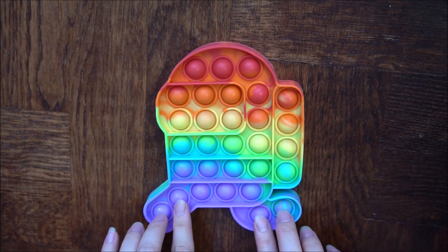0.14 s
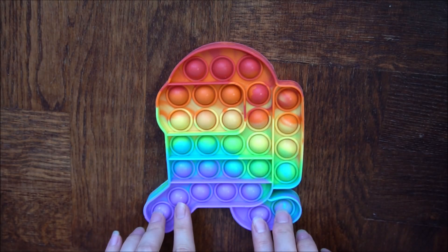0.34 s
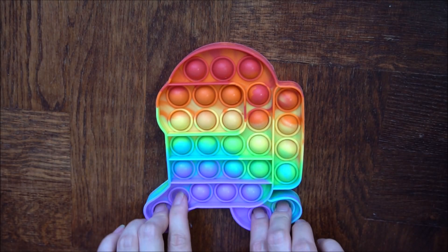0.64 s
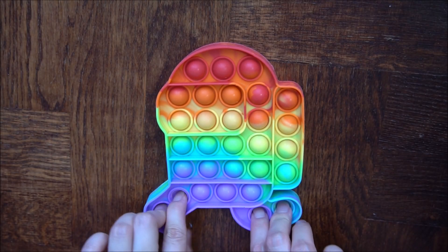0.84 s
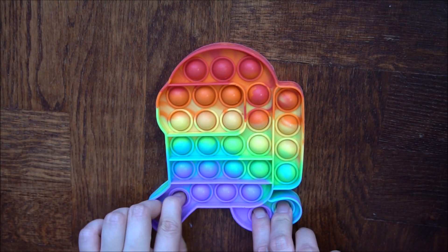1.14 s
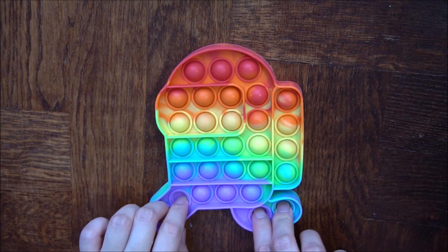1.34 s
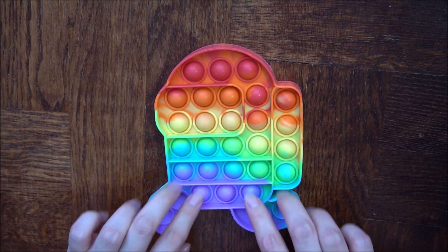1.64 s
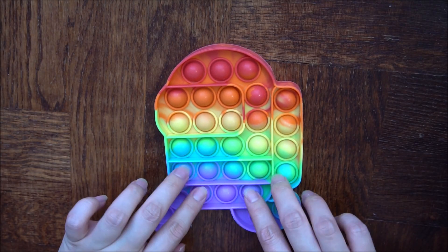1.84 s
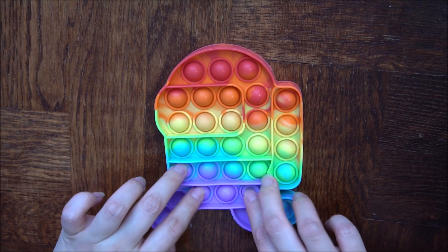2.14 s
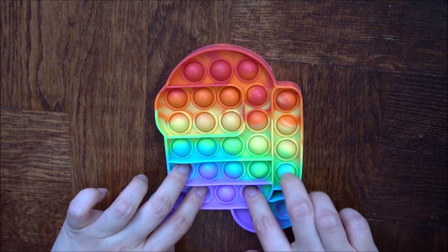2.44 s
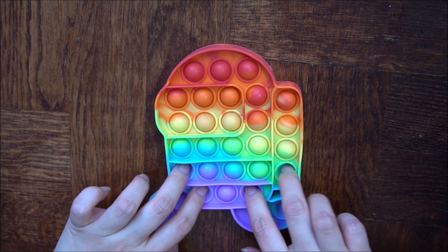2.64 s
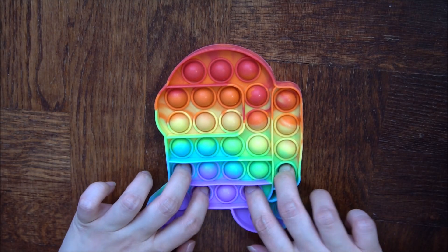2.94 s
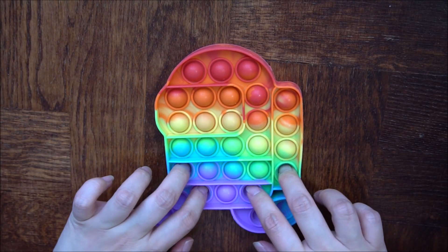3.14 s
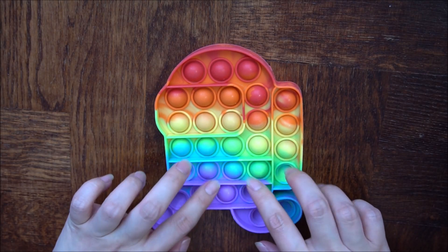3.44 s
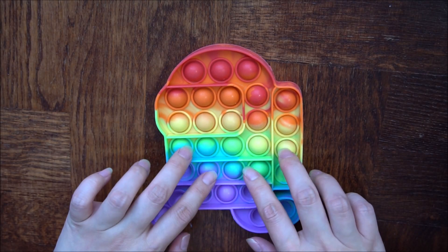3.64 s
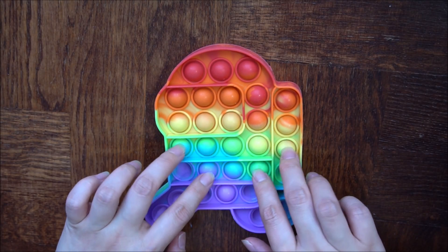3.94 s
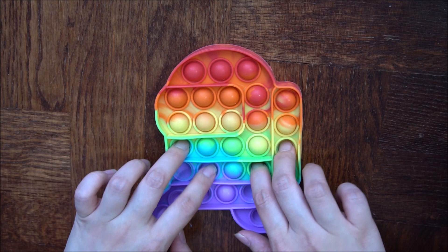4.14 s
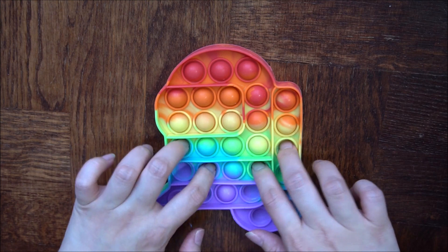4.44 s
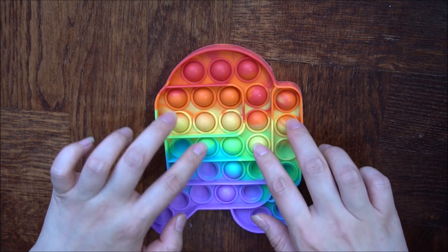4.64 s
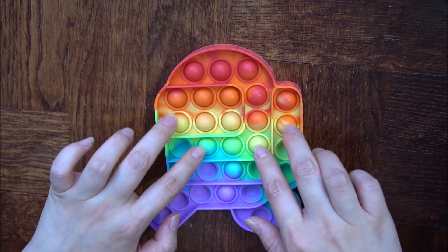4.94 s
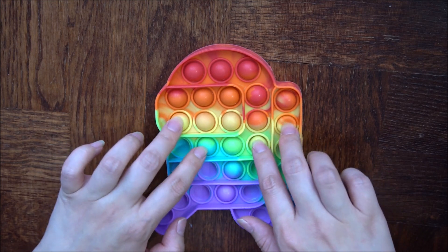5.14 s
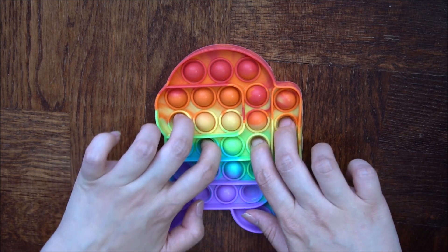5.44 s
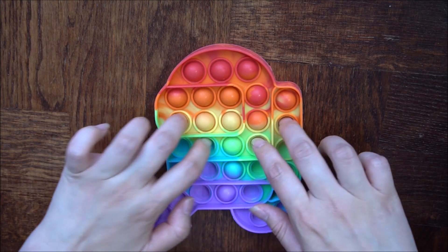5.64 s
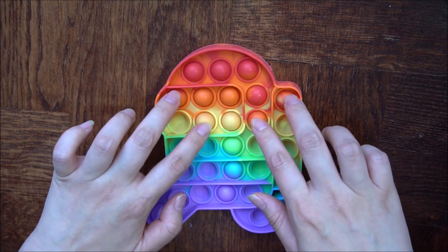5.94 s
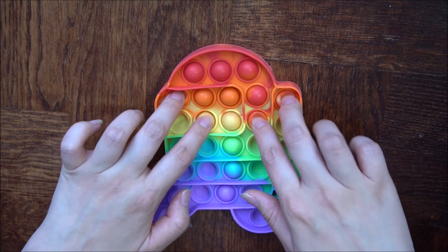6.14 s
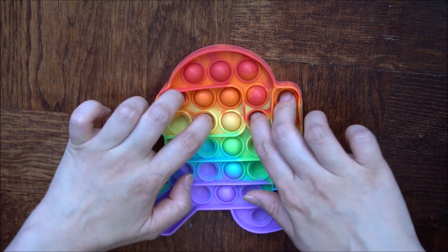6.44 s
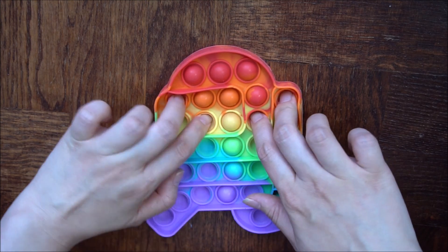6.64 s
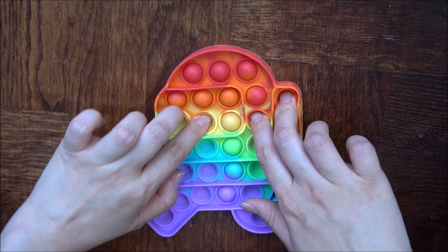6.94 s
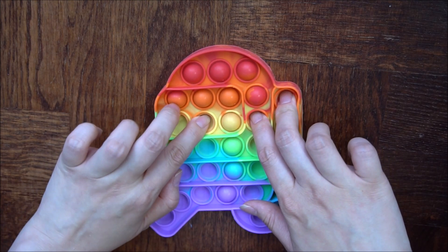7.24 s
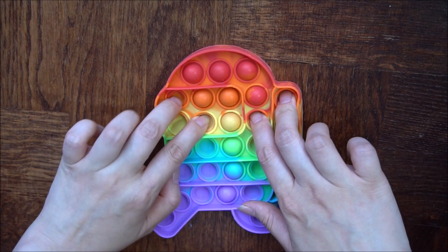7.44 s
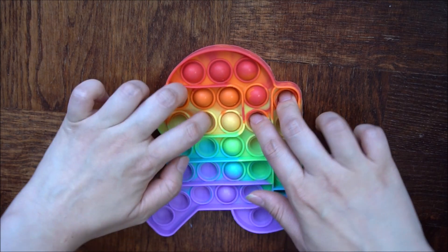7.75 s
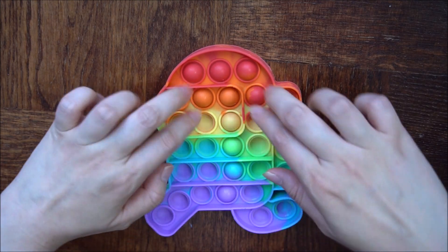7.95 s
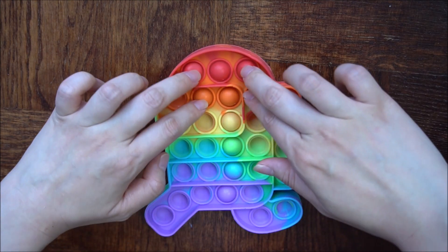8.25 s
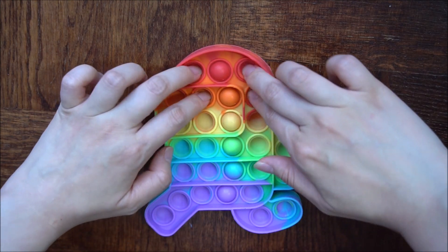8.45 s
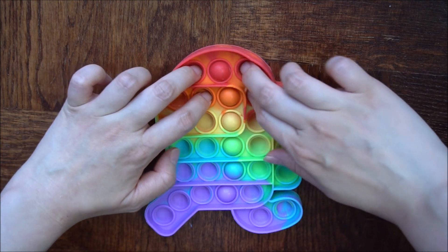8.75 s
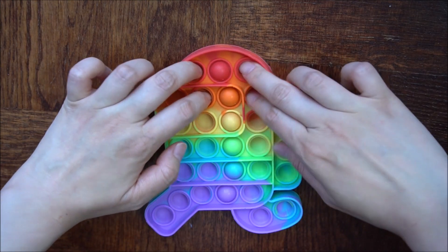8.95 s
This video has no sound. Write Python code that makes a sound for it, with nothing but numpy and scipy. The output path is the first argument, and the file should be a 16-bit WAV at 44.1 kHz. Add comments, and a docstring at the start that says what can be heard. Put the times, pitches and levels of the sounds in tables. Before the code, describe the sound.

In a small, quiet room, a silicone bubble toy is popped on a wooden tabletop, close to the microphone. The hollow pops fall singly or in pairs about every second or two, the loudest near the middle, with a sharp snapping one a little later, then softer ones. Gentle fingertip knocks and faint squeaks of skin on rubber fill the gaps, over steady low rumble, hiss and a very faint thin whine.

```python
"""In a small, quiet room, fingertips press the bubbles of a silicone pop-it toy on a wooden table.
Each dome flips with a short hollow ring, slaps the wood and sometimes snaps sharply; between pops, fingers
knock softly, rub and squeak on the rubber. Underneath lie room rumble and a close stereo microphone's
hiss and thin whine. A low hum comes up near the end."""
import sys
import numpy as np
from scipy import signal
from scipy.io import wavfile
from scipy.ndimage import uniform_filter1d

SR = 44100
rng = np.random.default_rng(int(sys.argv[2]) if len(sys.argv) > 2 else 0)


def wrap_up_sound(samples):
    """Save the sound to the file named by the first command line argument, as 16-bit audio."""
    columns = np.atleast_2d(samples).T
    # keep every value between -1 and 1, then stretch to whole-number steps
    tamed = np.clip(columns, -1, 1)
    steps = np.round(tamed * 32767).astype(np.int16)
    wavfile.write(sys.argv[1], SR, steps)


N = 401751
TIME = np.arange(N) / SR
BRIEF = TIME[:SR // 10]

# tone colour of the rumble and hiss: (frequency [Hz], relative spectral density [dB])
BED_SPECTRUM = [(22, -26), (31, -4.5), (42, -5.5), (90, 0.5), (134, -1.5), (204, -1), (270, -8),
                (388, -6.5), (472, -9.5), (624, -11.5), (825, -12), (1330, -16), (5380, -23),
                (12100, -25.5), (13200, -22), (16000, -27)]
# how alike left and right are in that bed: (frequency [Hz], correlation [0-1])
BED_LIKENESS = [(30, 0.51), (100, 1), (250, 0.27), (700, 0.05), (2000, 0.04), (15000, 0.19)]
# electronic whine: (pitch [Hz], width [Hz], level [dB])
WHINE_LINES = [(5486, 120, -78), (10950, 250, -82), (13151, 25, -76)]
# soft fingertip knocks, levels as for the flips: (time [s], dome pitch [Hz], dome [dB], tick [dB])
FINGER_KNOCKS = [(0.5534, 656, -34.5, -34.5), (.948, 390, -47, -50), (1.7142, 760, -44, -43),
                 (1.7279, 570, -35.5, -56), (2.273, 480, -38, -53), (2.417, 550, -32.5, -53),
                 (4.51, 530, -35.5, -48.5), (5.7203, 520, -36, -42.5), (6.7435, 444, -40.5, -61),
                 (6.9351, 510, -31.5, -66), (7.2228, 500, -32, -52), (7.3924, 430, -37.5, -42),
                 (8.1207, 515, -39, -49), (8.397, 553, -41.5, -61), (8.615, 480, -33, -52),
                 (8.624, 587, -36.5, -60), (9.0033, 517, -33.5, -49)]
# dome flips, each level being the part's energy packed into one millisecond: (time [s], dome pitch [Hz],
# dome [dB], table thud [dB], slap [dB], slap pitch [Hz], snap [dB], snap pitch [Hz])
DOME_FLIPS = [(.5732, 816, -12.5, -39, -20, 1470, -31, 6960),
              (.6733, 560, -24.5, -25.5, -18.5, 1496, -24.5, 10140),
              (2.2799, 505, -24.5, -29, -34.5, 1220, -50, 4500),
              (2.2972, 570, -31, -32.5, -25, 1170, -42.5, 3280),
              (2.6434, 380, -32, -32, -30, 870, -51, 6100), (4.1278, 554, -9, -43, -20, 1060, -31, 2360),
              (4.138, 495, -21.5, -27, -26, 1120, -27.5, 6400),
              (4.2029, 690, -17.5, -32, -21, 1326, -35, 3400),
              (5.2403, 834, -14.5, -32.5, -24.5, 1106, -33, 2800),
              (5.3355, 493, -19, -33, -21.5, 1320, -26, 2880),
              (6.258, 664, -19.5, -30, -13.5, 1236, -11.5, 8130),
              (6.2609, 560, -23.5, -38.5, -27, 1200, -22.5, 7600),
              (6.877, 810, -28, -30.5, -41, 1040, -54, 3600),
              (7.523, 800, -25.5, -28.5, -27.5, 1224, -32.5, 3920),
              (8.476, 432, -28, -29.5, -28, 1090, -41, 4000)]
# thud of the wooden table: (frequency [Hz], relative level [dB], t60 [s])
WOOD_MODES = [(192, -2.5, 0.034), (243, 1.5, 0.023), (306, -1.5, 0.025), (420, 0, 0.015), (481, 0.5, 0.022)]
# rubber slapping the table top: (frequency [x slap pitch], relative level [dB], t60 [s])
RUBBER_MODES = [(1.0, 12.5, 0.01), (1.2, 4.5, 0.029), (1.36, 6, 0.012), (1.55, 6.5, 0.012),
                (1.85, 8.5, 0.0028), (2.3, -12, 0.011)]
# sharp snap of a dome's rim: (frequency [x snap pitch], relative level [dB], t60 [s])
RIM_MODES = [(.47, 11.5, 0.0018), (.67, 14, 0.0018), (.89, 6, 0.011), (1.0, 9, 0.0052),
             (1.13, 15.5, 0.0017)]
# early reflections off the table and nearby things: (delay [s], gain [x pressure])
REFLECTIONS = [(.00325, 0.25), (.00495, 0.13), (.0059, 0.24), (.00638, -0.11), (.0081, .18), (.0089, -0.15),
               (.0108, -0.22)]
# lingering ring of table and room: (frequency [Hz], level [dB], t60 [s])
ROOM_RINGS = [(389, -79, 0.23), (492, -52.5, 0.17), (592, -49, 0.11), (688, -66, 0.57), (862, -56, 0.24),
              (950, -62, 0.22)]
# diffuse room tail: (frequency [Hz], level [dB], t60 [s])
ROOM_TAIL = [(149, 2, 0.16), (387, -4, 0.36), (734, -2.5, 0.3), (1500, -4.5, 0.31), (2930, -2, 0.3),
             (7700, -5.5, 0.31), (11100, -6, 0.19), (16000, -8, 0.082)]
# skin sliding and peeling on silicone: (time [s], length [s], centre [Hz], level [dB])
SKIN_RUBS = [(.931, 0.024, 6000, -58), (1.497, .017, 3870, -57), (1.54, 0.064, 4460, -62),
             (2.259, 0.045, 5700, -55.5), (3.122, 0.032, 10000, -55.5), (3.132, 0.043, 3480, -57),
             (4.107, 0.007, 7960, -55), (4.5, 0.054, 2840, -56), (5.697, 0.046, 4230, -55),
             (7.508, 0.015, 12000, -40), (7.944, 0.092, 3230, -59), (8.813, 0.068, 3830, -59.5),
             (8.985, 0.022, 7960, -55.5)]
# stick-slip squeaks: (time [s], pitch [Hz], peak level [dB])
SKIN_SQUEAKS = [(3.34, 2500, -52), (3.53, 3520, -54), (5.07, 3820, -52), (5.562, 3780, -51.5),
                (6.742, 2340, -47.5), (6.80, 3580, -52), (6.866, 3460, -46.5), (7.166, 3620, -54),
                (8.007, 2180, -47.5), (8.01, 3770, -48.5)]


def from_db(db):
    """Decibels to gain."""
    return 10 ** (np.asarray(db) / 20)


def rms_one(x):
    """Scale to unit rms."""
    return x / np.sqrt(np.mean(x ** 2) + 1e-20)


def one_ms(x):
    """Scale to the energy of one millisecond at unit rms."""
    return x / np.sqrt(np.sum(x ** 2) * 1000 / SR + 1e-20)


def at_hz(table, hz, column=1):
    """Read a column of a table on a log-frequency axis."""
    table = np.array(table)
    return np.interp(np.log(hz), np.log(table[:, 0]), table[:, column])


def add(track, time_s, sound):
    """Drop a sound onto a track at its cue."""
    at = int(round(time_s * SR))
    track[at:at + len(sound)] += sound[:N - at]


def band(x, hz, octaves):
    """Band-pass around a centre."""
    edges = np.clip([hz / 2 ** (octaves / 2), hz * 2 ** (octaves / 2)], 10, .48 * SR)
    return signal.sosfilt(signal.butter(2, edges, "band", fs=SR, output="sos"), x)


def stereo_bands(size):
    """Half-octave bands of two unrelated noises: (centre [Hz], noise pair)."""
    white = rng.standard_normal((2, 2, size))
    centres = 22 * 2 ** (np.arange(20) / 2)
    return [(hz, band(white[k % 2], hz, 0.49)) for k, hz in enumerate(centres)]


def rumble_and_hiss(level_db=-51.5):
    """The bed: room rumble near the centre, under the microphone's own wide hiss."""
    bed = 0
    for hz, (mid, side) in stereo_bands(N):
        likeness = at_hz(BED_LIKENESS, hz)
        width = np.sqrt((1 - likeness) / (1 + likeness))
        bed += from_db(at_hz(BED_SPECTRUM, hz)) * (mid + width * side * [[1], [-1]])
    return from_db(level_db) * bed / np.std(bed.mean(axis=0))


def wavering_tone(hz, width_hz):
    """Noise at unit rms, squeezed so narrow that it sings as an unsteady tone."""
    return rms_one(band(rng.standard_normal(N), hz, np.log2(1 + width_hz / hz)))


def whine(swell_at_s=4.6, swell_width_s=0.47, swell_db=6):
    """A thin electronic whine runs throughout and swells once."""
    lines = sum(from_db(db) * wavering_tone(hz, width) for hz, width, db in WHINE_LINES)
    return lines * from_db(swell_db * np.exp(-((TIME - swell_at_s) / swell_width_s) ** 2))


def decay(t60, t=BRIEF):
    """An envelope that falls 60 dB in t60 seconds."""
    return np.exp(-np.log(1000) * t / t60)


def ring(hz, t60, t=BRIEF):
    """A struck resonance: a dying sine."""
    return np.sin(2 * np.pi * hz * t) * decay(t60, t)


def struck(modes, pitch=1):
    """All modes of a body ring from one hit, neighbours in opposite polarity."""
    return sum((-1) ** k * from_db(db) * ring(pitch * hz, t60) for k, (hz, db, t60) in enumerate(modes))


def pop(dome_hz, dome_db, thud_db, slap_db, slap_hz, snap_db, snap_hz,
        dome_attack_s=0.00027, thud_attack_s=0.00048, ring_cycles=10.8, overtone_ratio=1.577):
    """A dome buckles: the air under it rings, the table thuds, the rubber slaps and its rim snaps."""
    dome_t60 = ring_cycles / dome_hz
    dome = ring(dome_hz, dome_t60) - from_db(-10) * ring(overtone_ratio * dome_hz, dome_t60)
    dome *= 1 - np.exp(-BRIEF / dome_attack_s)
    thud = struck(WOOD_MODES) * (1 - np.exp(-BRIEF / thud_attack_s))
    slap = struck(RUBBER_MODES, slap_hz)
    # skin tearing free of the rubber adds a short crackle to the snap
    crackle = band(rng.standard_normal(len(BRIEF)), snap_hz, octaves=3.7) * decay(t60=0.022)
    snap = one_ms(struck(RIM_MODES, snap_hz)) + from_db(-10) * one_ms(crackle)
    layers = [(dome_db, dome), (thud_db, -thud), (slap_db, -slap), (snap_db, snap)]
    return sum(from_db(db) * one_ms(layer) for db, layer in layers)


def knocks_and_pops(low_cut_hz=190):
    """Soft knocks and full flips set the same parts ringing; so small a toy radiates no deep bass."""
    track = np.zeros(N)
    for time_s, *flip in DOME_FLIPS:
        add(track, time_s, pop(*flip))
    for time_s, dome_hz, db, tick_db in FINGER_KNOCKS:
        knock = pop(dome_hz, db, thud_db=db - 2.5, slap_db=db - 5.5, slap_hz=1112,
                    snap_db=tick_db, snap_hz=4330)
        add(track, time_s, knock)
    return signal.sosfilt(signal.butter(4, low_cut_hz, "high", fs=SR, output="sos"), track)


def room(x, build_s=0.00081, reflection_cut_hz=6000, spread_s=.00006):
    """Direct sound, dull early reflections, a few lingering rings and a tail that dies band by band."""
    t = TIME[:SR // 2]
    response = np.zeros((2, len(t)))
    for k, (delay, gain) in enumerate(REFLECTIONS):
        # reflections come from alternate sides and reach one capsule first
        lags = (delay + (-1) ** k * spread_s * np.array([[-.5], [.5]])) * SR
        response += gain * np.sinc(np.arange(len(t)) - lags)
    response = signal.lfilter(*signal.butter(1, reflection_cut_hz, fs=SR), response)
    response[:, 0] += 1  # direct sound
    response += sum(from_db(db) * ring(hz, t60, t) for hz, db, t60 in ROOM_RINGS)
    for hz, (mid, side) in stereo_bands(len(t)):
        fade = decay(at_hz(ROOM_TAIL, hz, column=2), t) * (1 - np.exp(-t / build_s))
        likeness = min(610 / hz, .9)  # long waves reach both capsules alike
        pair = np.sqrt((1 + likeness) / 2) * mid + np.sqrt((1 - likeness) / 2) * side * [[1], [-1]]
        response += from_db(at_hz(ROOM_TAIL, hz)) * pair * fade / np.linalg.norm(fade)
    return signal.fftconvolve(x[None], response, axes=1)[:, :N]


def rubs(grain_db=2.0, clump_db=5.0):
    """Sliding skin is a swarm of tiny, uneven slips that come in clumps of a few milliseconds."""
    track = np.zeros(N)
    clumps = rms_one(uniform_filter1d(rng.standard_normal(N), size=130))
    slips = rng.standard_normal(N) * from_db(grain_db * rng.standard_normal(N) + clump_db * clumps)
    for time_s, length_s, hz, db in SKIN_RUBS:
        stroke = signal.windows.tukey(int(length_s * SR), .5)
        grains = band(slips[int(time_s * SR):][:len(stroke)], hz, octaves=1.4)
        add(track, time_s, from_db(db) * rms_one(grains * stroke))
    return track


def squeaks(length_s=0.009, waver_depth=0.045):
    """A fingertip sticks and slips for a moment: a tiny chirp of unsteady pitch."""
    track = np.zeros(N)
    swell = np.sin(np.pi * np.minimum(BRIEF / length_s, 1))
    for time_s, hz, db in SKIN_SQUEAKS:
        waver = rms_one(uniform_filter1d(rng.standard_normal(len(BRIEF)), size=60))
        pitch = hz * (1 + waver_depth * waver)
        add(track, time_s, from_db(db) * swell * np.sin(2 * np.pi * np.cumsum(pitch) / SR))
    return track


def hum(start_s=8.42, rise_s=0.15, level_db=-52):
    """A low, wavering hum fades in near the end and stays."""
    fade_in = np.clip((TIME - start_s) / rise_s, 0, 1)
    return from_db(level_db) * wavering_tone(hz=129, width_hz=14) * fade_in


def scene():
    """The toy sits dead centre in the room, over the noise bed, whine and hum."""
    toy = knocks_and_pops() + rubs() + squeaks()
    return room(toy) + rumble_and_hiss() + whine() + hum()


def record(dry):
    """Peaks clip at full scale and a steep high cut takes off the very top."""
    high_cut = signal.ellip(10, .1, 70, 15700, fs=SR, output="sos")
    return signal.sosfilt(high_cut, np.clip(dry, -1, 1))


dry = scene()
out = record(dry)
wrap_up_sound(out)
```